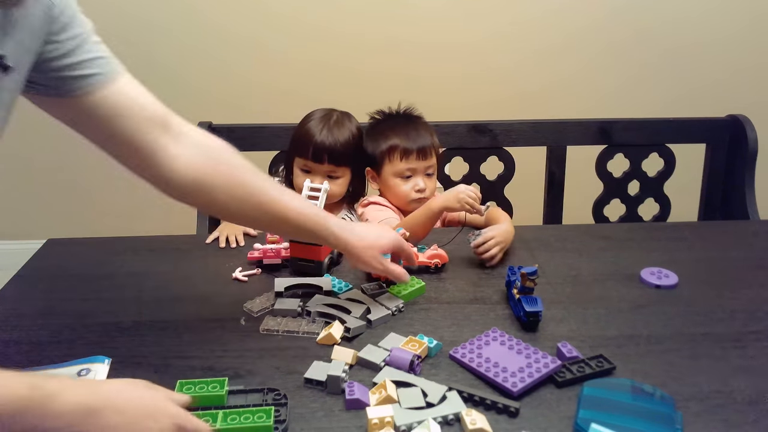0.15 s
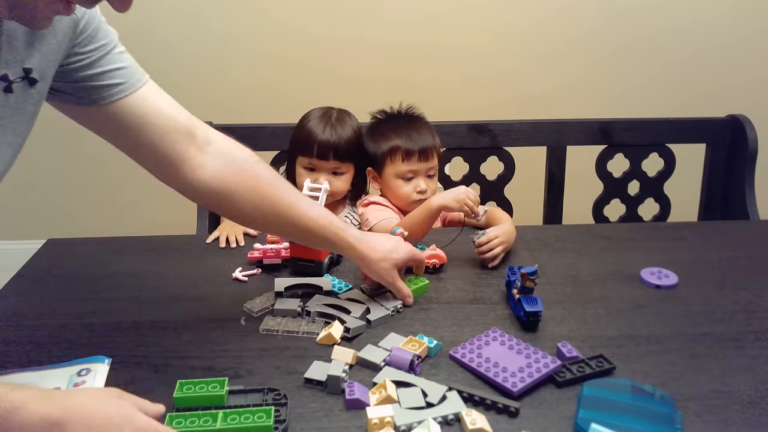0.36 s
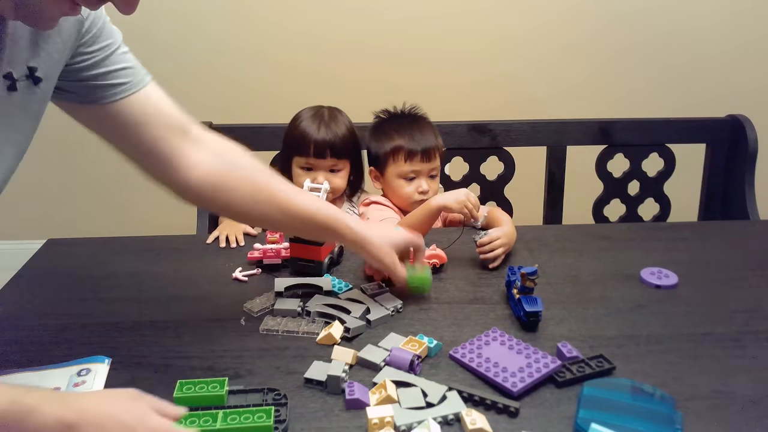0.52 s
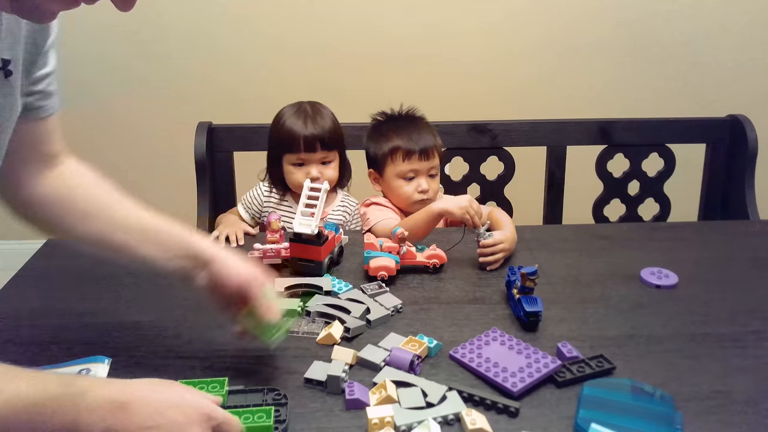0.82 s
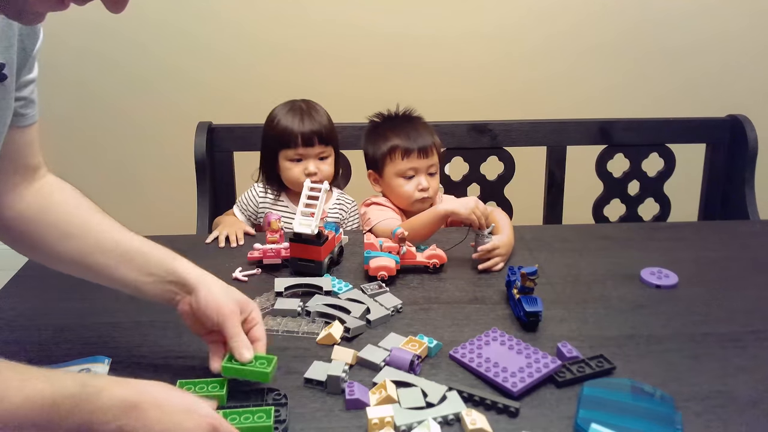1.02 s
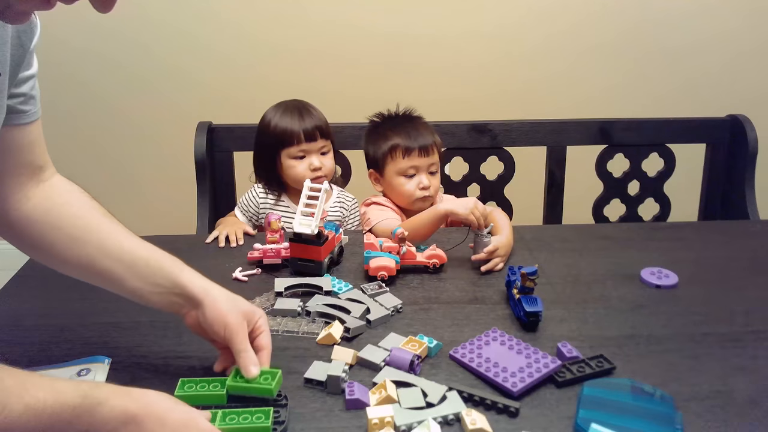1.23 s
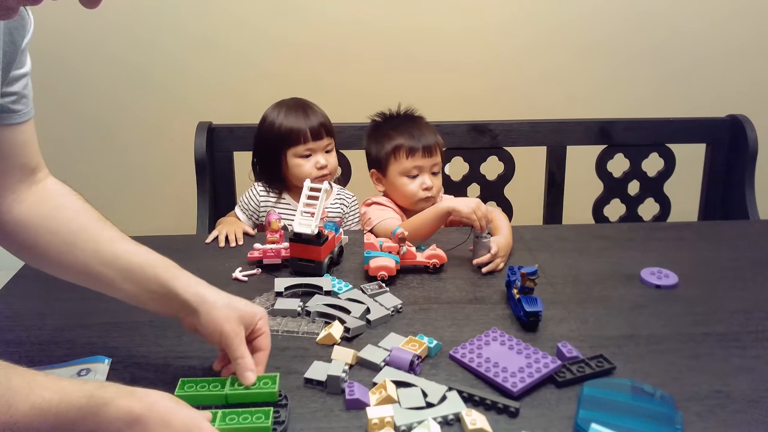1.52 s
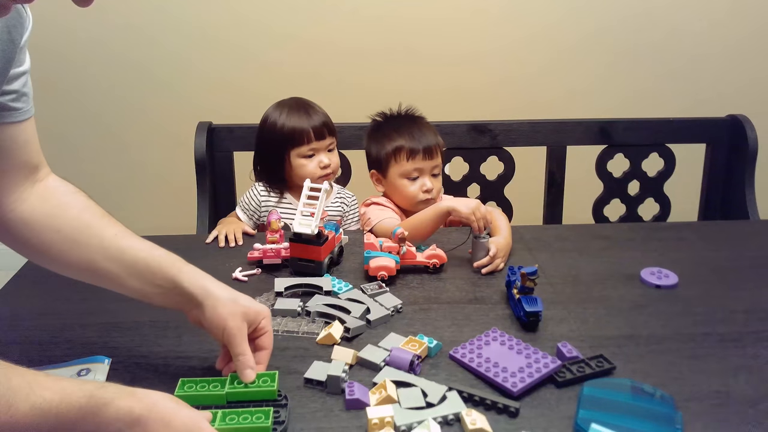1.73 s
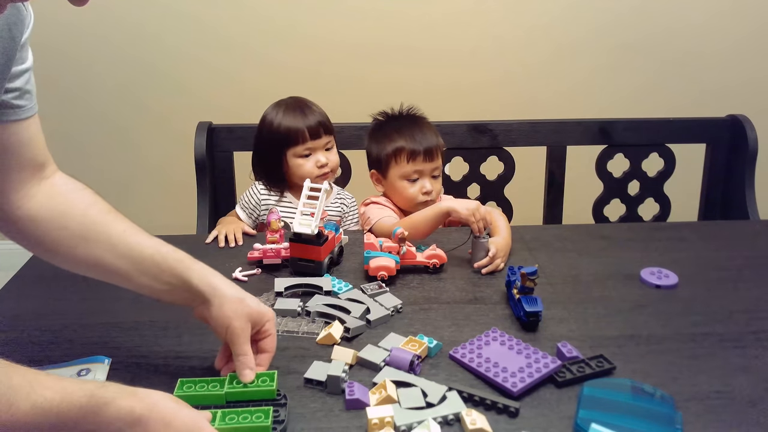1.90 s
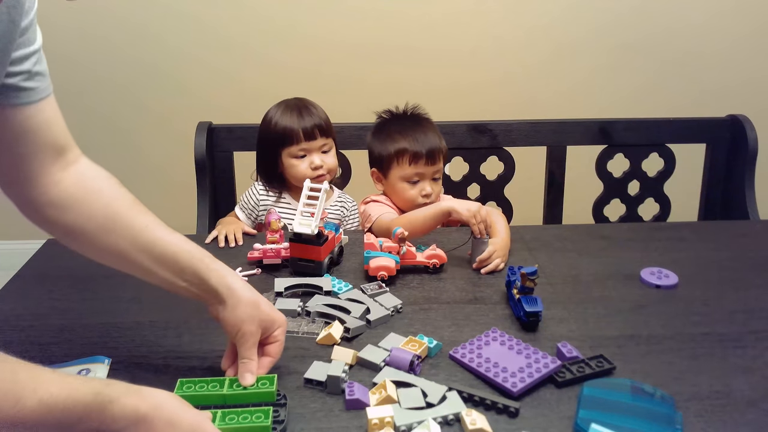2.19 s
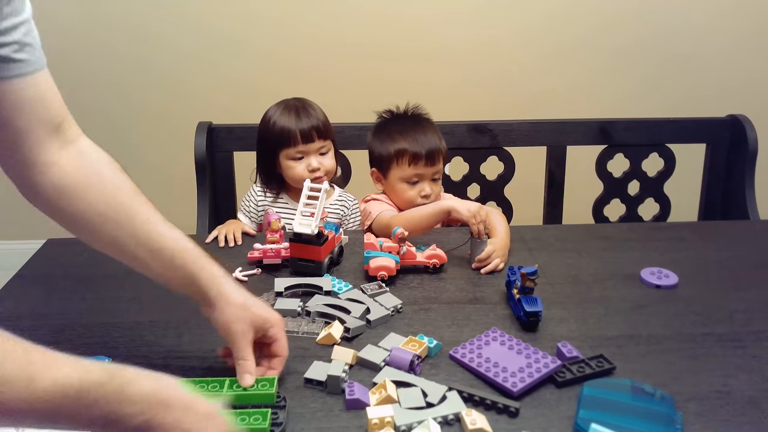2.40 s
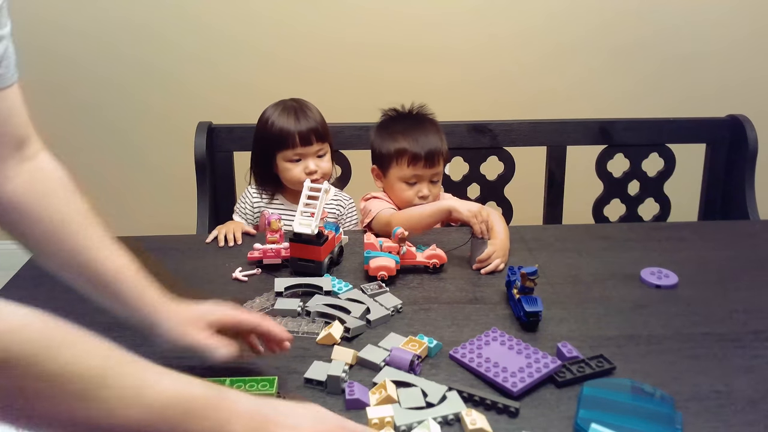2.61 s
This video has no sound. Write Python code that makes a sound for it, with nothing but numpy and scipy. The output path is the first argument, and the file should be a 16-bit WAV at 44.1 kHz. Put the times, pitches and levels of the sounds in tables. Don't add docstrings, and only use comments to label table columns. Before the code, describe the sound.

Toy building blocks clicking and pressing together, one sharp loud snap, then landing on a tabletop

```python
import sys
import numpy as np
from scipy import signal
from scipy.fft import rfft, irfft
from scipy.io import wavfile
from scipy.ndimage import uniform_filter1d

SR = 44100
rng = np.random.default_rng(int(sys.argv[2]) if len(sys.argv) > 2 else 0)


def convert_level_to_amplitude(level_db):
    exponent = np.asarray(level_db, float) / 20
    return 10 ** exponent


def generate_wav(sig):
    pcm = np.round(np.clip(np.atleast_2d(sig).T, -1, 1) * 32767).astype(np.int16)
    wavfile.write(sys.argv[1], SR, pcm)


N = 121275
SEAT_T60_S = .06


def band_pass(x, low, high, order=2):
    return signal.sosfilt(signal.butter(order, [low, high], "band", fs=SR, output="sos"), x)


def contact(db, length):
    slips_per_s, spread_db = 3000, 5.5
    size = SR // 4
    height = convert_level_to_amplitude(spread_db * np.minimum(rng.exponential(1, size), 3))
    signs = rng.choice([-1, 1], size)
    happens = rng.random(size) < slips_per_s / SR
    rub = 0.065 * rng.standard_normal(size)
    u = np.arange(size) / SR / length
    rise = 0.51 if length > .007 else .0004 / length
    swell = np.clip(np.minimum(u / rise, (1 - u) / (1 - rise)), 0, 1) ** 0.39
    run = (height * signs * happens + rub) * swell
    return run / np.sqrt(np.sum(run ** 2) + 1e-20) * np.sqrt(length / .01) * convert_level_to_amplitude(db)


def ring(clicks, hz, t60):
    r = convert_level_to_amplitude(-60 / (max(t60, .001) * SR))
    w = 2 * np.pi * hz / SR
    return signal.lfilter([0, np.sin(w)], [1, -2 * r * np.cos(w), r * r], clicks + 1e-18)


def struck(runs, hz, t60):
    rung = ring(runs, hz, t60)
    full = np.sum(runs ** 2, -1, keepdims=True) * max(t60, .001) * SR / (4 * np.log(1000))
    return rung * np.sqrt(full / np.sum(rung ** 2, -1, keepdims=True))


def placed(times, sounds):
    out = np.zeros(N + SR)
    for s, sound in zip(times, sounds):
        start = int(s * SR)
        out[start:start + len(sound)] += sound
    return out[:N]


def body(rows, modes, crack_db, grip_t60=.026):
    crack_hz, near_crack_db, mode_spread_db, scatter_t60 = 2520, -5, 1.5, .0055
    runs = np.array([contact(db, length) for _, db, length, _ in rows])
    times, _, _, tilt = np.transpose(rows)
    luck = rng.standard_normal((len(rows), len(modes)))
    crack_level = convert_level_to_amplitude(crack_db + 2 * np.minimum(tilt, 0))[:, None]
    crack = crack_level * band_pass(runs + 1e-18, crack_hz / 3, crack_hz * 2, order=1)
    near, spread = convert_level_to_amplitude(near_crack_db) * crack, crack
    middle_hz = modes[len(modes) // 2][0]
    for k, (hz, db, t60) in enumerate(modes):
        level = db + tilt * np.log2(hz / middle_hz) + mode_spread_db * luck[:, k]
        gain = (-1) ** k * convert_level_to_amplitude(level)[:, None]
        held = 1 / (1 / t60 + 1 / grip_t60)
        blurred = 1 / (1 / held + min(1, hz / 700) / scatter_t60)
        near = near + gain * struck(runs, hz, held)
        spread = spread + gain * np.sqrt(held / blurred) * struck(runs, hz, blurred)
    return np.array([placed(times, near), placed(times, spread)])


# t/s, level/dB, length/s, tilt/(dB per octave)
SNAP_EVENTS = [
    (2.1250, -20, 0.0015, 2),
    (2.1270, -17, .002, 0),
    (2.1298, -23, .002, -1),
]
# f/Hz, level/dB, t60/s
SNAP_MODES = [(390, -7.5, 0.027), (1010, -15, 0.01), (1520, -6, 0.025), (2040, 5, 0.016),
              (2504, 10.5, 0.023), (3150, 2.5, 0.033), (3880, 3.5, 0.016), (4530, -11, .025),
              (4750, 1.5, 0.02), (5760, 1, 0.023), (6330, -10, 0.031), (6900, -8, 0.027),
              (7610, -20, 0.008), (8050, -7, 0.032), (10500, -34, .004)]


def snap():
    return body(SNAP_EVENTS, SNAP_MODES, 25, SEAT_T60_S)


# t/s, level/dB, length/s, tilt/(dB per octave)
LAND_EVENTS = [
    (2.1422, -24, 0.0035, 0),
    (2.1462, -27, .004, -2),
    (2.152, -35, 0.02, -2),
    (2.172, -39, 0.006, -5),
    (2.268, -47, 0.0078, -5),
]
# f/Hz, level/dB, t60/s
LAND_MODES = [(960, 3.5, 0.02), (1250, 3.5, 0.015), (1800, 2, 0.017), (2600, -1, 0.016), (3060, 1, 0.033),
              (3740, 1.5, .022), (4240, 2, .02), (4710, -2, 0.024), (5970, -12, 0.013), (5940, 1, 0.024),
              (7000, -1.5, 0.009), (7800, -2, 0.027), (11100, -28, 0.0026)]


def land():
    return body(LAND_EVENTS, LAND_MODES, 27.5)


# t/s, level/dB, length/s, tilt/(dB per octave)
SEAT_EVENTS = [
    (1.7545, -41, .005, 0.5),
    (1.7638, -25, 0.002, 0.5),
    (1.766, -28, .002, -0.5),
    (1.7688, -30, .002, -0.5),
    (1.781, -42, 0.006, -0.5),
]
# f/Hz, level/dB, t60/s
SEAT_MODES = [(770, -7, 0.048), (1050, -0.5, 0.014), (1300, -1.5, 0.077), (1694, 7.5, 0.057),
              (1876, 4, 0.02), (2780, 4, 0.023), (3140, -7.5, 0.021), (3850, -1.5, 0.0095),
              (4400, -5, 0.026), (4550, -3.5, 0.02), (4870, 2, .03), (5920, -9, 0.038), (6830, -2, 0.0091),
              (7770, -1.5, 0.021)]


def seat():
    return body(SEAT_EVENTS, SEAT_MODES, 13.5, SEAT_T60_S)


# t/s, level/dB, length/s, tilt/(dB per octave)
PRESS_EVENTS = [
    (1.383, -53, 0.0034, 0.1),
    (1.4757, -37, 0.003, -3.5),
    (1.4781, -29, .0018, -1),
    (1.481, -42, .013, -3),
    (1.493, -41, 0.018, -2),
    (1.5155, -43, 0.003, -2),
    (1.575, -58, 0.048, 0),
    (1.609, -55, 0.04, 2),
    (1.635, -52, 0.028, -3),
]
# f/Hz, level/dB, t60/s
PRESS_MODES = [(384, 2.5, 0.033), (594, 3, 0.042), (1176, 7, 0.038), (1570, 9.5, 0.15), (1710, 10.5, 0.12),
               (2456, 8, 0.11), (2690, 8.5, 0.011), (3160, 5.5, 0.014), (4380, 5, 0.0058), (5030, 1, .02),
               (5730, -3, 0.027), (6270, -2.5, 0.045), (7640, -1.5, 0.026)]


def press():
    return body(PRESS_EVENTS, PRESS_MODES, 22)


# t/s, level/dB, length/s, tilt/(dB per octave)
SET_EVENTS = [
    (1.058, -47, 0.008, -2),
    (1.0655, -37, .004, -2),
    (1.070, -37, .005, 0.5),
    (1.0797, -33, 0.003, -0.5),
    (1.0855, -35, .004, -1),
    (1.091, -38, .006, 0.5),
    (1.099, -43, 0.014, 0),
    (1.295, -60, 0.026, 5),
]
# f/Hz, level/dB, t60/s
SET_MODES = [(390, -5, 0.052), (670, 0, 0.036), (716, 1.5, 0.075), (1190, 3, 0.069), (1554, 5.5, 0.013),
             (1680, 4, 0.029), (2250, 1, 0.0062), (3630, -7, 0.026), (4500, -20, 0.024), (4800, -14, 0.023),
             (7060, -16, 0.09), (7800, -11, 0.05)]


def set_on_studs():
    return body(SET_EVENTS, SET_MODES, 13, SEAT_T60_S)


# t/s, level/dB, length/s, tilt/(dB per octave)
DRAG_EVENTS = [(.351, -48, 0.018, -3), (.362, -45, .014, -3), (.375, -43, .0075, -1.5),
               (.381, -49, .02, -2), (.4025, -44, 0.005, 1), (.430, -46, .004, -2),
               (.4338, -39, 0.004, -1.5), (.440, -46, 0.012, -4), (.451, -49, .022, -4),
               (.546, -52, 0.025, -2), (.572, -48, .0075, -2), (.583, -56, .022, -1)]
# f/Hz, level/dB, t60/s
DRAG_MODES = [(1020, 3, 0.02), (1180, 5, 0.021), (1480, 7, 0.032), (2060, 4.5, 0.011), (2600, 1.5, 0.018),
              (3720, 6.5, 0.022), (4270, 2.5, 0.023), (4800, 4.5, 0.01), (5450, 0, 0.01), (6250, -4, 0.03),
              (7350, -3, 0.014), (9600, -6, .006)]


def drag():
    return body(DRAG_EVENTS, DRAG_MODES, 15)


# t/s, level/dB, length/s, tilt/(dB per octave)
DROP_EVENTS = [
    (2.550, -35.5, 0.0027, -0.5),
    (2.559, -56.5, .004, -4.5),
    (2.568, -54, 0.0068, -5.5),
]
# f/Hz, level/dB, t60/s
DROP_MODES = [(740, 5.5, 0.02), (980, -4, 0.032), (1530, -1.5, 0.044), (2370, 6, .008), (3390, -9, 0.016),
              (4460, -9, 0.028), (7800, -30, .012)]


def drop_piece():
    return body(DROP_EVENTS, DROP_MODES, 16, SEAT_T60_S)


# t/s, level/dB, length/s, tilt/(dB per octave)
TAP_EVENTS = [
    (.1625, -31, 0.003, -2),
    (.170, -45, .035, 0),
    (.8015, -37, 0.0016, 1),
]
# f/Hz, level/dB, t60/s
TAP_MODES = [(398, 0, 0.09), (497, -0.5, 0.034), (604, -4, 0.12), (730, -7, 0.096), (795, -1, 0.032),
             (1140, -0.5, 0.026), (1390, -5.5, 0.051), (1600, -7, 0.017), (3740, -5.5, 0.012)]


def tap_far_side():
    return body(TAP_EVENTS, TAP_MODES, -6, .1)


# t/s, level/dB, length/s, f/Hz
TICK_EVENTS = [(0.054, -46.5, 0.0084, 2600), (.053, -48.5, .006, 12000), (.054, -54, 0.013, 7660),
               (0.162, -52, .03, 8000), (0.297, -47, 0.0033, 2720), (0.682, -57.5, 0.081, 4020),
               (0.83, -53, 0.049, 4500), (1.036, -58, 0.012, 4320), (1.19, -52, .02, 4420),
               (1.191, -58, .012, 5200), (1.41, -45.5, 0.011, 954), (2.158, -41, 0.0042, 4710),
               (2.296, -35.5, 0.0034, 2250), (2.352, -52, 0.041, 3150), (2.407, -48.5, 0.0071, 5700),
               (2.41, -49, 0.0051, 3260), (2.482, -47.5, 0.036, 2660), (2.485, -50, 0.031, 4800),
               (2.48, -60, .04, 8000),
               (1.643, -46, .022, 1600),
    (2.486, -48, 0.017, 910),
    (2.504, -45, .014, 930),
]


def fidgets():
    rows = TICK_EVENTS
    sounds = []
    for _, db, length, hz in rows:
        run = contact(db, length)
        tone = struck(run, hz, max(.017, 36 / hz))
        rasp = convert_level_to_amplitude(1.0) * ring(run, hz, .0015)
        sounds.append(tone + rasp)
    straight_and_room = convert_level_to_amplitude([[0], [-5]])
    return straight_and_room * placed(np.array(rows)[:, 0], sounds)


# t/s, level/dB, length/s, tilt/(dB per octave)
THUD_EVENTS = [
    (1.07, -51, 0.025, 11.5),
    (1.383, -44, 0.0036, -2.5),
    (1.477, -49, 0.015, 1),
    (1.764, -41, 0.02, 0),
    (2.127, -31, 0.0072, -1.5),
    (2.143, -30, 0.0101, -0.5),
    (2.172, -36.5, 0.0074, 10),
    (2.55, -51, 0.0095, -6.5),
]
# f/Hz, level/dB, t60/s
THUD_MODES = [(78.3, -4, 0.076), (108, 1.5, 0.053), (198, -3, 0.15), (256, -5.5, 0.12), (383, -3.5, 0.093),
              (502, 0.5, 0.05), (623, -7, 0.041), (760, -8.5, 0.069)]


def table_thuds():
    return band_pass(body(THUD_EVENTS, THUD_MODES, -40, .2), 65, 1500)


def lean():
    push = np.zeros(N)
    push[int(2.19 * SR)] = convert_level_to_amplitude(-48)
    return ring(push, 32, 0.81)


def at_hz(points, hz):
    table = np.array(points)
    return np.interp(np.log(hz), np.log(table[:, 0]), table[:, 1])


def bands(size):
    edges = 20 * 2 ** np.arange(0, 10.1, .5)
    white = rng.standard_normal((2, size + SR // 4))
    for k, (low, high) in enumerate(zip(edges, edges[1:])):
        yield np.sqrt(low * high), band_pass(white[k % 2], low, high)[SR // 4:]


# f/Hz, t60/s
ROOM_DECAY = [(100, 0.6), (400, 0.83), (1500, 0.41), (4000, 0.38), (8000, 0.26), (14000, 0.055)]


def room(x):
    first_echo_s = .005
    t = np.arange(SR) / SR
    tail = sum(band * convert_level_to_amplitude(-60 * t / at_hz(ROOM_DECAY, hz)) for hz, band in bands(SR))
    tail = tail * np.clip(t / first_echo_s - .5, 0, 1)
    return signal.fftconvolve(x, tail / np.sqrt(np.sum(tail ** 2)))[:N]


def rms_one(x):
    return x / np.sqrt(np.mean(x ** 2) + 1e-20)


def drift(rate):
    r = np.exp(-80 * np.pi * rate / SR)
    slow = signal.lfilter([1], [1, -2 * r, r * r], rng.standard_normal(N // 40 + 2002))[2000:]
    return np.interp(np.arange(N) / 40, np.arange(len(slow)), rms_one(slow))


# f/Hz, level/(dB per Hz)
FLOOR_COLOUR = [(12, -32), (20, 2), (81, -5.5), (186, 0), (651, -7), (935, -5), (2160, -11.5), (7560, -18),
                (15600, -25)]
# t/s, level/dB
HAND_BUSTLE = [
    (0, 0),
    (.55, 1.5),
    (.7, -1),
    (1.0, -1),
    (1.2, 0.86),
    (2.0, 0.14),
    (2.55, 0.9),
    (2.68, -4),
    (2.75, -4.5),
]


def floor():
    patchy_db, bass_patchy_db = .7, 2.0
    together = drift(3)
    noise = np.zeros(N)
    for hz, band in bands(N):
        patchy = patchy_db + bass_patchy_db * min(1, 150 / hz)
        noise += band * convert_level_to_amplitude(at_hz(FLOOR_COLOUR, hz) + patchy * (.5 * together + drift(8)))
    bustle = np.interp(np.arange(N) / SR, *np.transpose(HAND_BUSTLE))
    return convert_level_to_amplitude(-56.5 + bustle) * rms_one(noise)


def scene():
    blocks = drag() + set_on_studs() + press() + seat() + snap() + land() + drop_piece()
    blocks = blocks + tap_far_side() + fidgets()
    blocks = band_pass(blocks, 257, 11900)
    table = table_thuds()
    straight = blocks[0] + table[0]
    echoes = room(convert_level_to_amplitude(-6) * blocks[1] + convert_level_to_amplitude(-3.5) * table[1])
    return (straight + echoes + lean() + floor())[None]


# t/s, length/s
TOP_GAPS = [
    (.158, .027),
    (1.468, .02),
    (1.726, .058),
    (2.106, .031),
]


def without_top(dry):
    t = np.arange(N) / SR
    hz = np.arange(N // 2 + 1) * SR / N
    top = irfft(rfft(dry) * (hz > 8650), N)
    gaps = sum((t > s) & (t < s + length) for s, length in TOP_GAPS) * 1.
    shut = uniform_filter1d(gaps, size=200)
    return dry - top * shut * (1 - convert_level_to_amplitude(-45))


def top_cut(x):
    return signal.sosfilt(signal.butter(12, 15740, fs=SR, output="sos"), x)


def record(dry):
    mix = without_top(dry)
    return top_cut(mix)


dry = scene()
out = record(dry)
generate_wav(out)
```